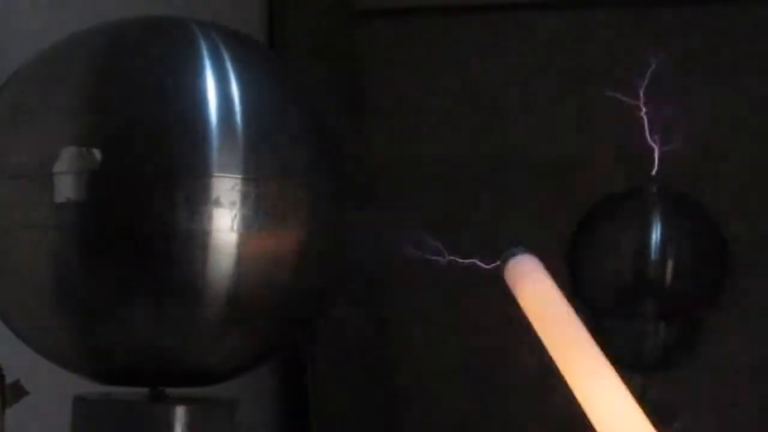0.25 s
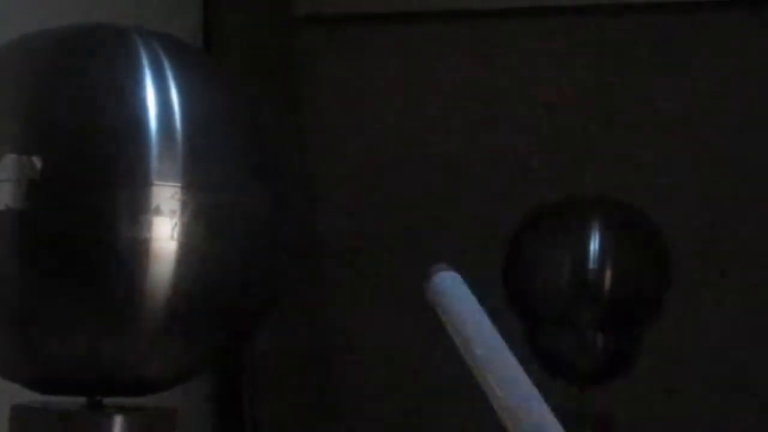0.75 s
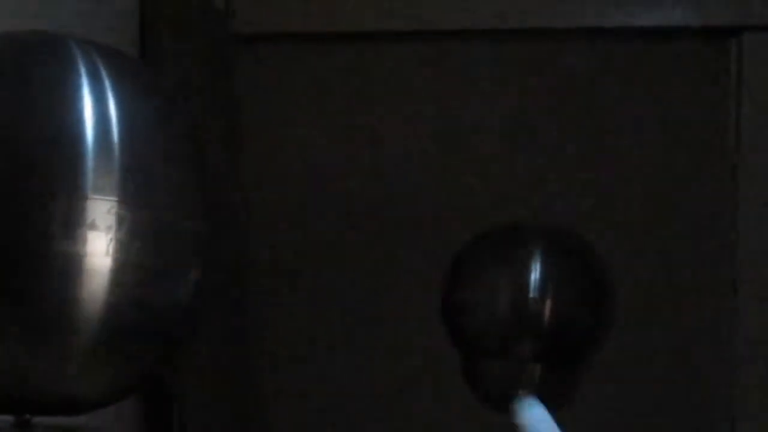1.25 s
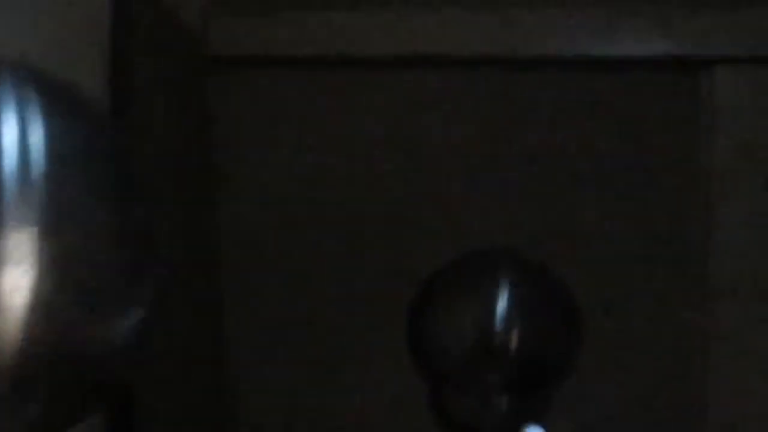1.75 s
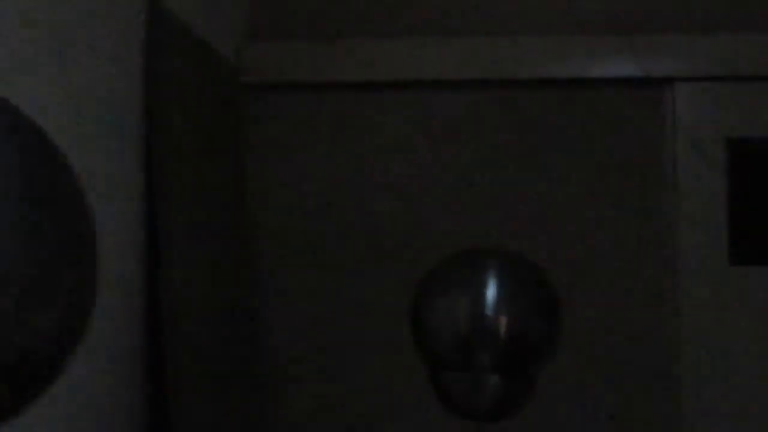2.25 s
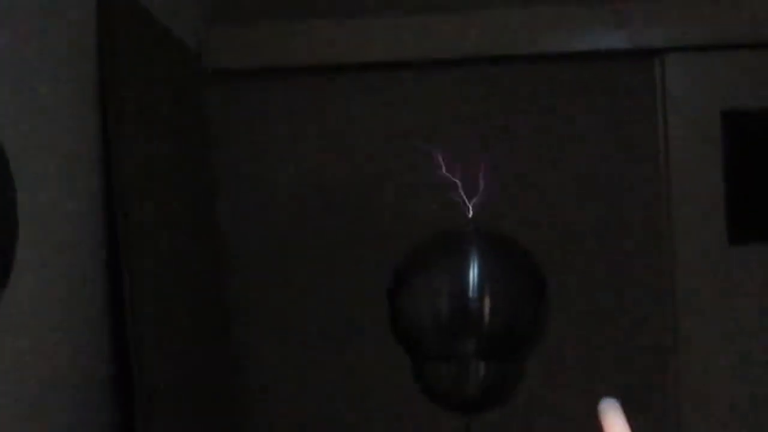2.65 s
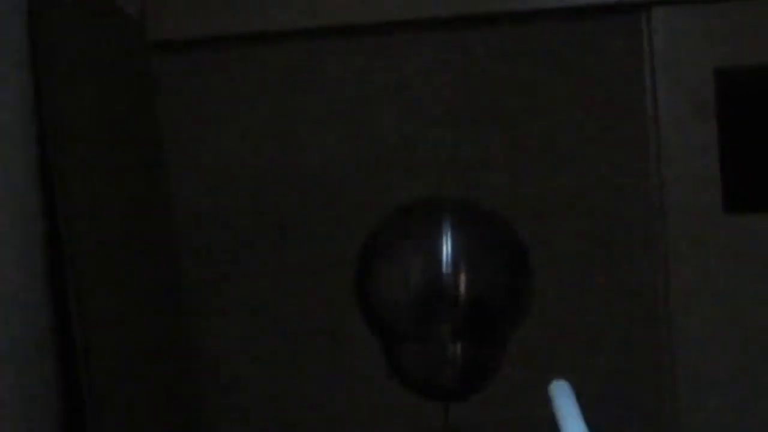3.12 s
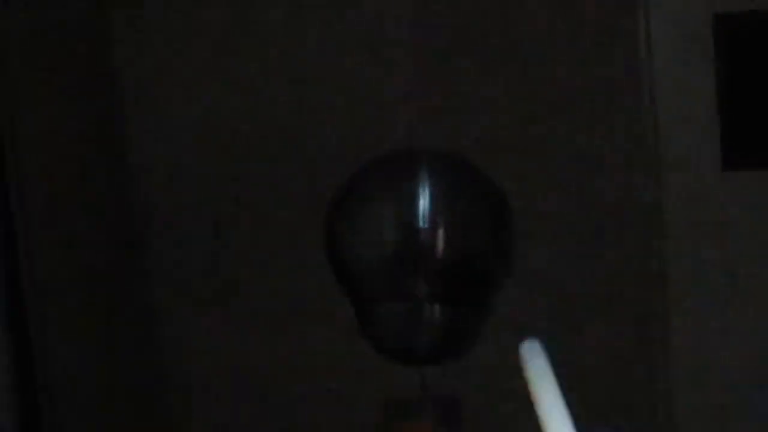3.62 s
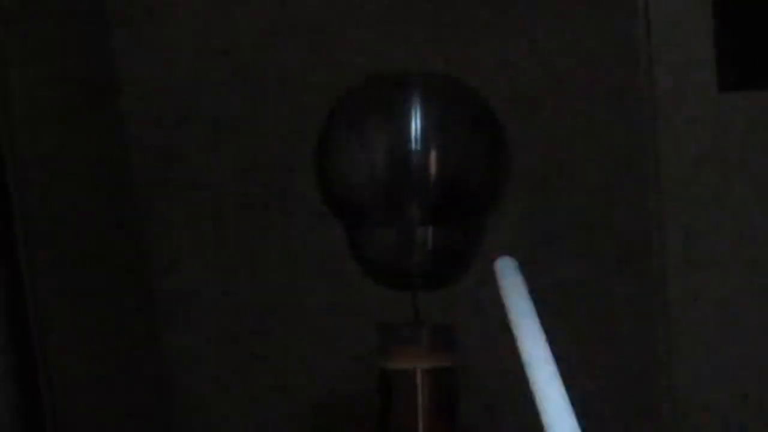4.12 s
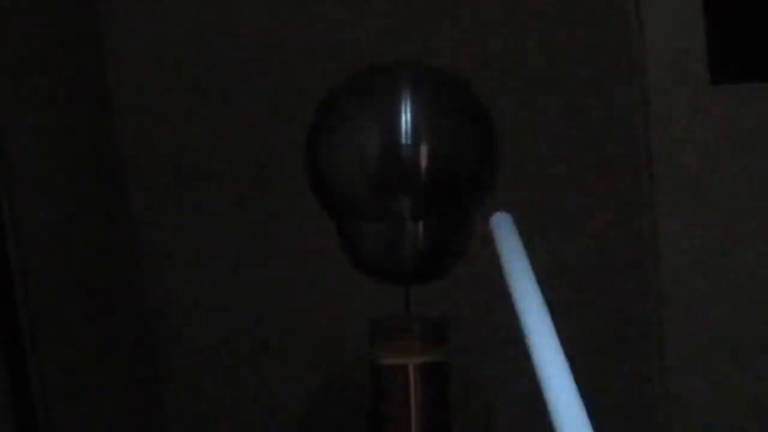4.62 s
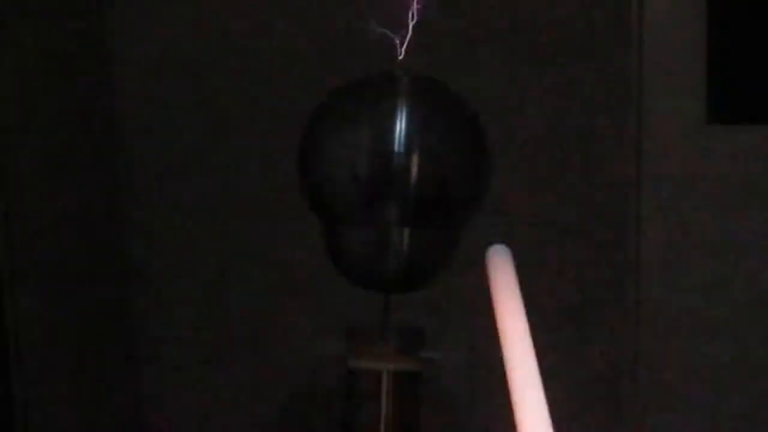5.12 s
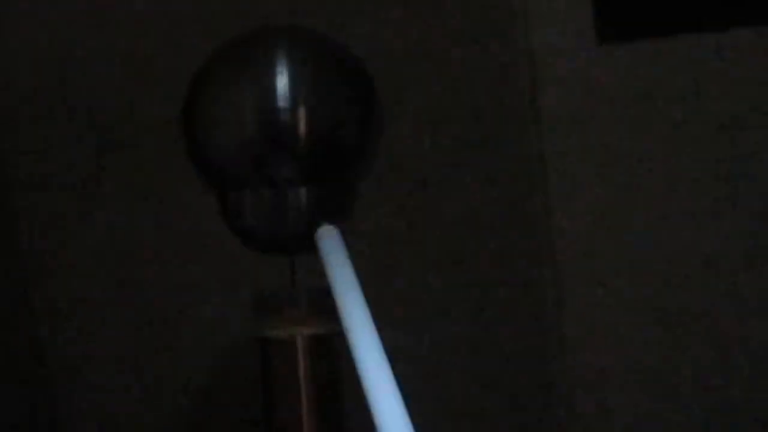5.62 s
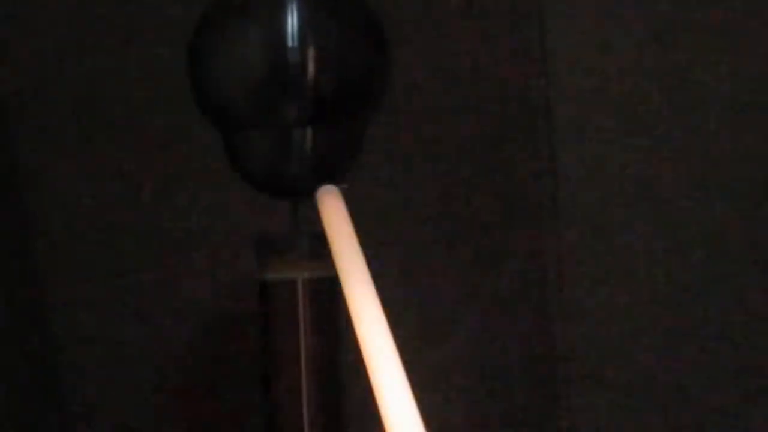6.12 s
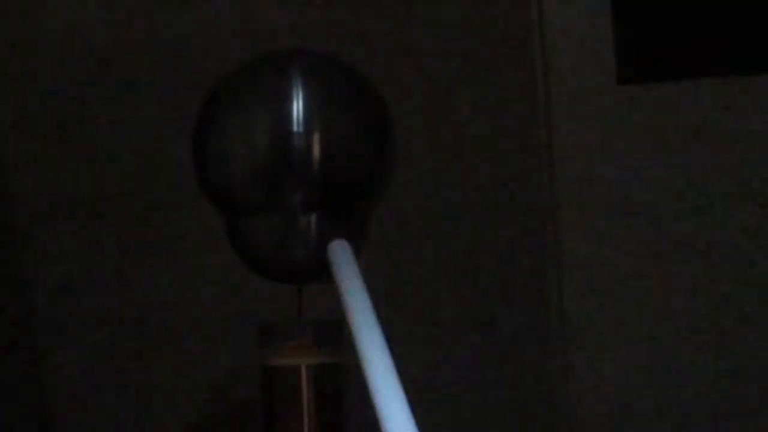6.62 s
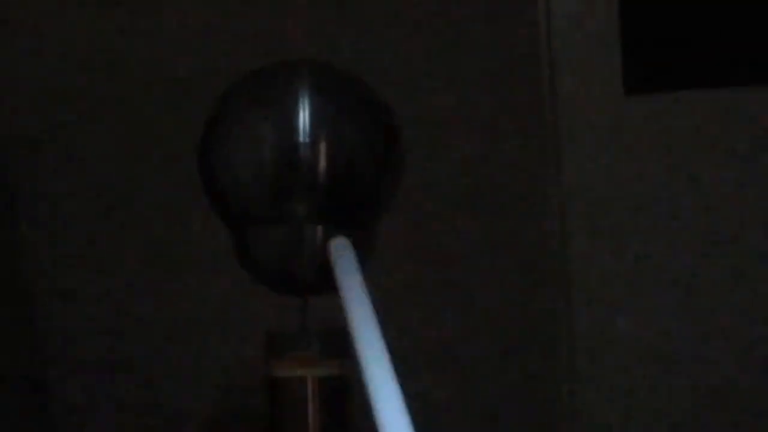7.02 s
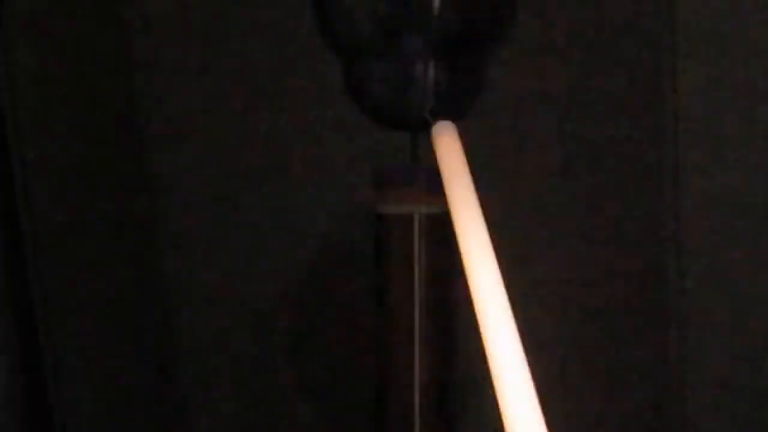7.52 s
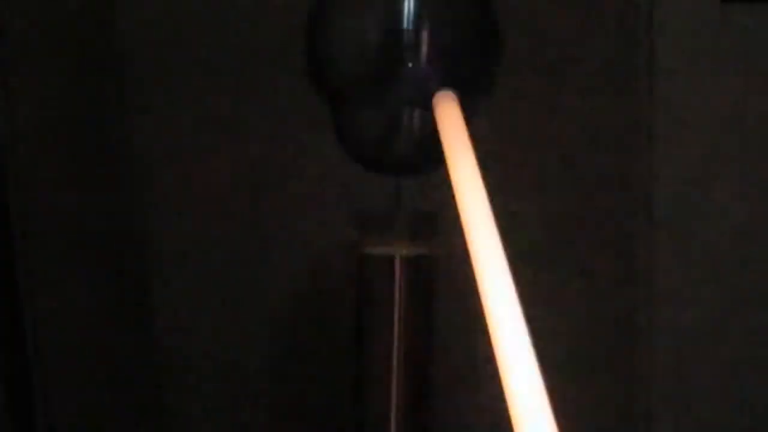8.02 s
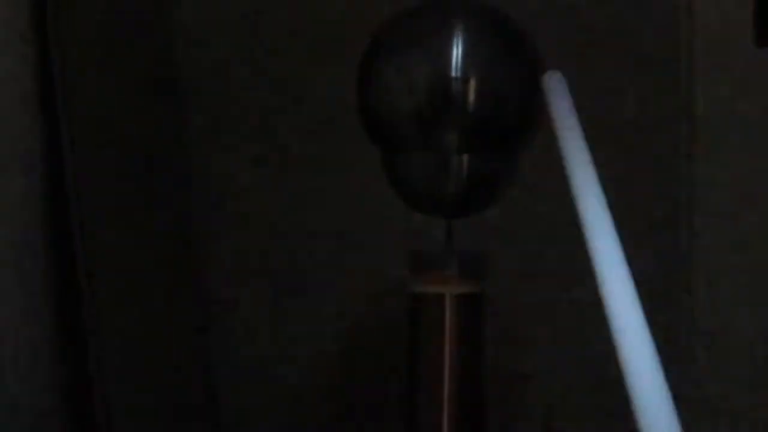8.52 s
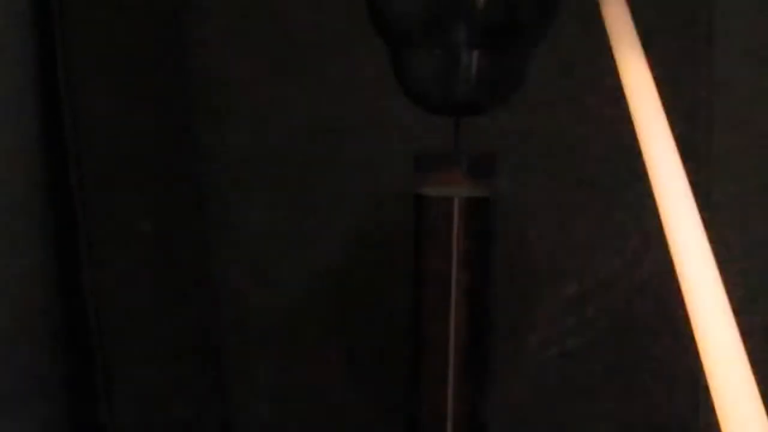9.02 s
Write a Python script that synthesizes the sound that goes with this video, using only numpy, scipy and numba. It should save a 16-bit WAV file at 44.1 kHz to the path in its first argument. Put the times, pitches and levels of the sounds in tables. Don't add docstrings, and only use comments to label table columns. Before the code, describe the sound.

High-voltage sparks crack in a harsh, stuttering rattle, about twenty a second with constant tiny skips, overloading a small microphone in a bare, ringing room.

```python
import sys
import numpy as np
from scipy import signal
from scipy.fft import rfft, irfft
from scipy.io import wavfile
from numba import njit

SR = 44100
rng = np.random.default_rng(int(sys.argv[2]) if len(sys.argv) > 2 else 0)


def unload_wav(signal):
    wavfile.write(
        sys.argv[1],
        SR,
        np.round(np.clip(np.atleast_2d(signal).T, -1, 1) * 32767).astype(np.int16),
    )


def makeup_ratio(level_db):
    decades = np.asarray(level_db, float) / 20
    return 10 ** decades


N = 408366
LEAD = SR
TOP_HZ = 15800
ARC_ENDS_S = 1.1
BEAT_S = 0.045

# start_s, first_spark_db, later_sparks_re_first_db, first_lopsided_overload_percent of full scale
ARC_RUNS = [(0.0011, -14, -4, -0.69), (0.1375, -16, -7, 1.6), (0.275, -15, -3, 1.1),
            (0.4118, -15, -8, -0.76), (0.6866, -21, -11, 1.05), (0.8247, -14, -6, 0.17),
            (0.9624, -17, -5.5, 0.72), (1.1007, -19, -7, 0.21)]
STREAMER_RUNS = [(1.1957, -18.5, -1.5, 1.2), (1.3345, -16, -5.5, -0.31), (1.6529, -23, -3, 0.66),
                 (1.9281, -26.5, -4, 0.69), (2.0648, -15, -7, -0.53), (2.1588, -12, -7.5, 1.21),
                 (2.34, -13, -6.5, -0.61), (2.477, -12.5, -2.5, 0.57), (2.6135, -11.5, -5, 0.6),
                 (2.9808, -15, -7.5, 0.73), (3.161, -15.5, -7, 0.65), (3.2542, -16, -4, 0.58),
                 (3.3907, -15, -5.5, -0.83), (3.5696, -5, -8, 1.6), (3.9321, -9.5, -5, -0.81)]
TUBE_TO_COIL_RUNS = [(4.113, -13.5, -6.5, 0.5), (4.2484, -12, -6, 0.5), (4.383, -14.5, -7, -1.5),
                     (4.5186, -16.5, -3, -0.5), (4.6529, -16, -7, 0.3), (4.7884, -15.5, -7, 0.5),
                     (4.9231, -15, -9, 0.4), (5.0566, -9, -5, 1), (5.1488, -11, -4, 1.3),
                     (5.281, -13, -3, 1), (5.4161, -9, -7, 0.46), (5.5467, -13.5, -6.5, 0.3),
                     (5.7248, -15.5, -9, 3), (5.8597, -6.5, -11, 1.5), (5.993, -13.5, -4, 0.44),
                     (6.1264, -14.5, -7, 0.5), (6.2586, -12, -7, 1.2),
                     (6.3926, 0.5, -8.5, 1.2), (6.5257, -3.5, -6, 0.5), (6.6575, -5.5, -6.5, 0.6),
                   (6.7906, -6, -6.5, 0.5), (6.9222, -6, -10, 1.35), (7.0553, -5, -4.5, 0.8),
                   (7.187, -8, -5.5, 0.3), (7.4073, -13, -0.5, 1), (7.5398, -13, -2, 0.8),
                   (7.6729, -10.5, -5.5, 1), (7.8031, -14.5, -6, 0.61), (7.9348, -15.5, -5.5, 0.1),
                   (8.1094, -16, -7, 0.2), (8.1987, -15.5, -5.5, 0.5), (8.329, -15.5, -3.5, -0.1),
                   (8.4613, -13.5, -7.5, 0.5), (8.592, -17, -3.5, 1.5), (8.765, -5.5, -7, 1.51),
                   (8.8958, -5, -7, 2), (9.0258, -5, -7, 3), (9.1142, -8, -7, 0.2), (9.2449, -9.5, -5, 0.5)]
DOUBLE_MISSES = np.array([.2, .75, 3.5, 5.0, 5.66, 5.8, 6.2, 6.33, 8.7, 8.83, 8.96])
# time_s, direct_crack_re_echoes_db
FACING_MICROPHONE = [
    (0, -20),
    (1.1, -6),
    (2, 4),
    (3.3, 3),
    (4.2, 3),
    (5, 0.5),
    (6, 3.5),
    (7.1, 6.5),
    (8, -1),
    (9.26, 4),
]
# delay_ms in arc to tube, delay_ms for free streamers, level_db
NEAR_SURFACES = [(1.99, 2.05, 3.5), (3.544, 5.2, -0.5), (3.82, 4.3, 4.5), (4.83, 8.2, -5), (5.8, 18, -25),
                 (7.83, 7.9, -3), (8.9, 12, -18), (18.5, 6.3, -11), (31, 44, -10)]
# frequency_hz, level_db (per Hz)
CRACK_COLOUR = [(30, -71), (130, -31.5), (290, -20), (330, -18), (490, -10), (800, -4), (1350, 0),
                (1700, -2), (2700, -2), (3600, -1), (4500, -4.5), (9000, -9.5), (13500, -12),
                (16500, -18.5)]
# frequency_hz, t60_s
ROOM_DECAY = [(100, 3.6), (500, 1.51), (1500, 1.105), (4000, 0.89), (8000, 0.68), (12000, 0.41),
              (16000, 0.38)]
# pitch_hz, near_big_sphere_db, near_small_coil_db, t60_s
RESONANCES = [(320.8, -9.5, -9.5, 0.56), (462, -11, -23, 0.51), (597, -19, -10, 0.39),
              (749, -14.5, -14.5, 0.72), (846, -15.5, -8, 0.19), (900, -18, -10, 0.18),
              (1038, -8.5, -18.5, 0.21), (1126, -13.5, -15.5, 0.36), (1338, -12, -7, 0.083),
              (2260, -9.5, -4.5, 0.09)]


def firing():
    sag_db = -1.2
    later_overload, later_overload_scatter = -0.2, 0.2
    jitter_ms, spread_ms, spread_scatter_db = 0.3, 0.11, 2.5
    later_facing_db, facing_scatter_db = 2, 0.5

    runs = ARC_RUNS + STREAMER_RUNS + TUBE_TO_COIL_RUNS
    misses_s = np.asarray(DOUBLE_MISSES)
    next_starts = [run[0] for run in runs[1:]] + [runs[-1][0] + 2 * BEAT_S]
    rows = []
    for (first_s, first_db, later_db, overload), next_s in zip(runs, next_starts):
        beats = int(round((next_s - first_s) / BEAT_S))
        missed = 1 + np.sum((misses_s > first_s) & (misses_s < next_s))
        rows.append((first_s, first_db, overload, 0))
        for k in range(1, beats - missed):
            start_s = first_s + (next_s - first_s) * k / beats
            rows.append((start_s, first_db + later_db + sag_db * (k - 1), later_overload, 1))

    start_s, level_db, overload, later = np.transpose(rows)
    chance = rng.standard_normal((4, len(start_s)))
    direct_db = np.interp(start_s, *np.transpose(FACING_MICROPHONE))
    direct_db = direct_db + later_facing_db * later + facing_scatter_db * chance[0]
    start_s = start_s + later * jitter_ms / 1000 * chance[1]
    spread = spread_ms * makeup_ratio(spread_scatter_db * chance[2])
    overload = overload + later * later_overload_scatter * chance[3]
    return np.array([start_s, level_db, spread, direct_db, overload]).T


def channel(start_s, level_db, spread_ms, count):
    place = rng.random((len(start_s), count))
    size = makeup_ratio(3.5 * rng.standard_normal((len(start_s), count)))
    size = size / np.sqrt(np.sum(size ** 2, axis=1, keepdims=True))
    offset = np.clip(np.log(place / (1 - place)) / 2, -1.5, 1.5)
    arrival_s = start_s[:, None] + spread_ms[:, None] / 1000 * offset
    out = np.zeros(N + 2 * LEAD)
    np.add.at(out, np.round(arrival_s * SR).astype(int) + LEAD, makeup_ratio(level_db[:, None]) * size)
    return out[:N + LEAD]


def nook(start_s, level_db):
    level, t60_s, rise_ms = -15, 0.13, 4.03
    t = np.arange(SR // 4) / SR
    shape = makeup_ratio(level - 60 * t / t60_s) * (1 - np.exp(-(t * 1000 / rise_ms) ** 2))
    envelope = signal.fftconvolve(channel(start_s, level_db, 0 * start_s, count=1), shape)[:N + LEAD]
    grains = envelope * rng.standard_normal(N + LEAD) * rng.exponential(size=N + LEAD)
    return signal.lfilter(*signal.butter(1, 1520, "high", fs=SR), grains)


def on_log(table, hz):
    f, v = np.transpose(table)
    return np.interp(np.log(np.maximum(hz, 1)), np.log(f), v)


def room(along):
    level_db, rise_ms = -20, 0.83
    bass_grows_db = 1.5
    t = np.arange(SR + SR // 2) / SR
    hz = np.fft.rfftfreq(len(t), 1 / SR)
    spectrum = rfft(rng.laplace(size=len(t)) / np.sqrt(2))
    spectrum = spectrum * makeup_ratio(bass_grows_db * (along - 0.5) / (1 + (hz / 1900) ** 2))
    band_place = 2 * np.log2(np.maximum(hz, 40) / 40)
    ring = np.zeros(len(t))
    for k in range(19):
        band = irfft(spectrum * np.clip(1 - abs(band_place - k), 0, 1))
        ring += band * makeup_ratio(-60 * t / on_log(ROOM_DECAY, 40 * 2 ** (k / 2)))
    for pitch_hz, sphere_db, coil_db, t60_s in RESONANCES:
        decay = makeup_ratio(sphere_db + along * (coil_db - sphere_db) - 60 * t / min(t60_s, 0.3))
        ring += decay * np.sin(2 * np.pi * (pitch_hz * t + rng.random()))
    return makeup_ratio(level_db) * ring * (1 - np.exp(-t * 1000 / rise_ms))


def causal(table, size):
    cep = irfft(on_log(table, np.fft.rfftfreq(size, 1 / SR)) * np.log(10) / 20)
    cep[1:size // 2] *= 2
    cep[size // 2 + 1:] = 0
    h = irfft(np.exp(rfft(cep)))
    return h / np.sqrt(np.sum(h ** 2))


def sparks(rows):
    earlier = rows[rows[:, 0] < 0.9] - [0.917, 0, 0, 0, 0]
    start_s, level_db, spread_ms, direct_db, _ = np.vstack([earlier, rows]).T
    together = 0 * start_s

    out = channel(start_s, level_db + np.maximum(direct_db, 3), together, count=1)
    out += channel(start_s + 0.0001, level_db + direct_db, spread_ms, count=6)
    out += nook(start_s, level_db)
    out += channel(start_s, level_db - 10, 12 * spread_ms, count=8)

    for arc_ms, free_ms, echo_db in NEAR_SURFACES:
        wobble_db = 2.5 * rng.standard_normal(len(start_s))
        echo_s = start_s + np.where(start_s < ARC_ENDS_S, arc_ms, free_ms) / 1000
        smear_ms = spread_ms * (1 + free_ms / 12)
        out += channel(echo_s, level_db + echo_db + wobble_db, smear_ms, count=4)

    places = 7
    walked = np.clip(start_s, 0, None) * SR / N
    for along in np.linspace(0, 1, places):
        share = np.clip(1 - abs(walked - along) * (places - 1), 1e-9, 1)
        clicks = channel(start_s, level_db + 10 * np.log10(share), together, count=1)
        out += signal.fftconvolve(clicks, room(along))[:len(out)]
    return signal.fftconvolve(out, causal(CRACK_COLOUR, size=2048))[:len(out)]


@njit
def follow(x, attack, release):
    e, out = 0.1, np.empty(len(x))
    for i in range(len(x)):
        e += (abs(x[i]) - e) * (attack if abs(x[i]) > e else release)
        out[i] = e
    return out


def gain_control(x, attack_ms=2.96, release_ms=81.6, ratio=22.6, top_db=-15, knee=11.3):
    ceiling = 0.63
    e = follow(x, 1000 / (attack_ms * SR), 1000 / (release_ms * SR))
    y = x * (makeup_ratio(top_db) / (e + 1e-4)) ** (1 - 1 / ratio) / ceiling
    return ceiling * y / (1 + abs(y) ** knee) ** (1 / knee)


def thumps(start_s, overload_percent):
    push = np.zeros(N)
    push[(start_s * SR).astype(int)] = overload_percent / 100
    t = np.arange(SR // 50) / SR * 1000 / 0.51
    bump = signal.fftconvolve(push, 7.3 * t * np.exp(-t))[:N]
    return signal.sosfilt(signal.butter(1, 6, "high", fs=SR, output="sos"), bump)


def microphone_rumble():
    rumble = signal.lfilter([1], [1, -0.99], rng.standard_normal(N))
    return makeup_ratio(-71) * rumble / np.std(rumble)


def scene():
    fired = firing()
    input_top = signal.ellip(8, 0.2, 40, TOP_HZ, fs=SR, output="sos")
    driven = signal.sosfilt(input_top, sparks(fired) * makeup_ratio(20))
    low_cut = signal.butter(3, 150, "high", fs=SR, output="sos")
    thin = signal.sosfilt(low_cut, gain_control(driven))[LEAD:]
    heard = thin + thumps(fired[:, 0], fired[:, -1]) + microphone_rumble()
    return np.array([heard, heard])


def band_limit(x):
    return signal.sosfilt(signal.butter(12, 16970, fs=SR, output="sos"), x)


def record(dry):
    spectrum = rfft(dry)
    spectrum[:, int(TOP_HZ * N / SR):] *= makeup_ratio(-45)
    mix = irfft(spectrum, N)
    return band_limit(mix)


dry = scene()
out = record(dry)
unload_wav(out)
```